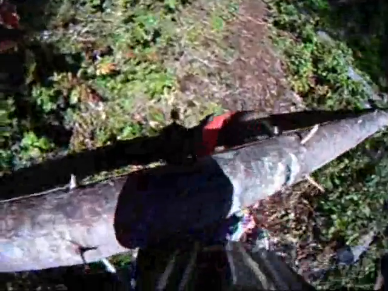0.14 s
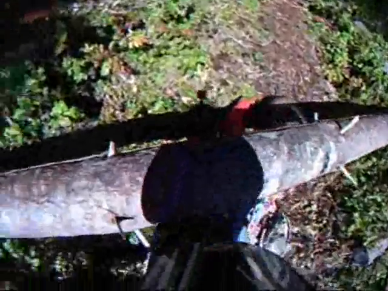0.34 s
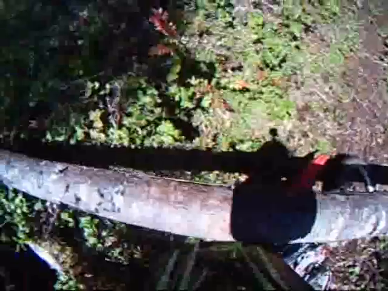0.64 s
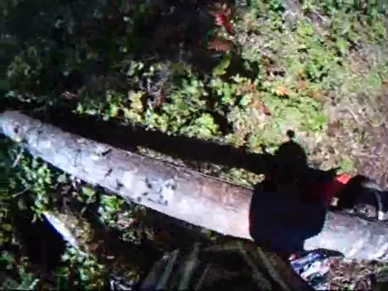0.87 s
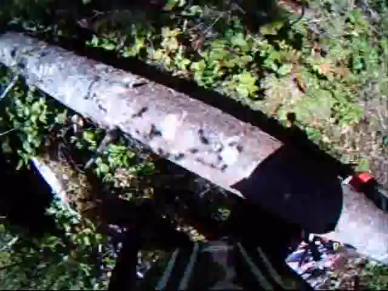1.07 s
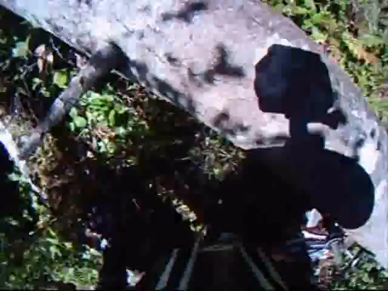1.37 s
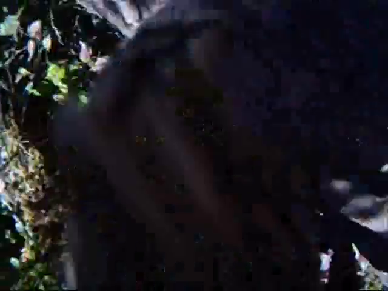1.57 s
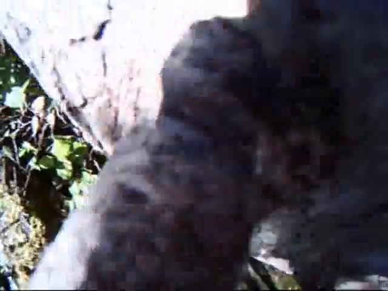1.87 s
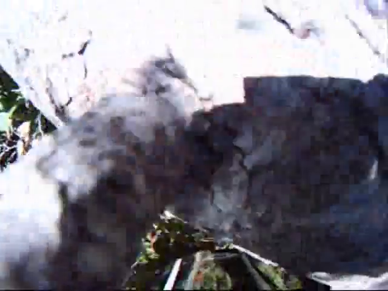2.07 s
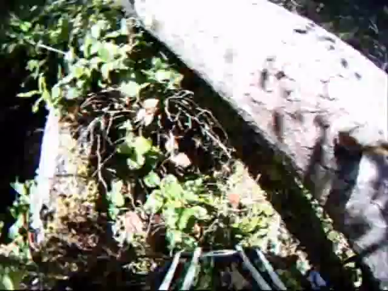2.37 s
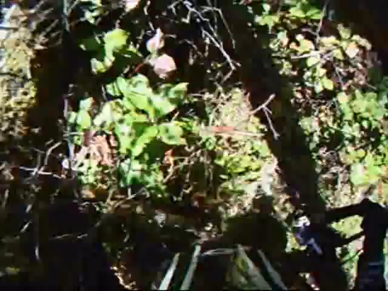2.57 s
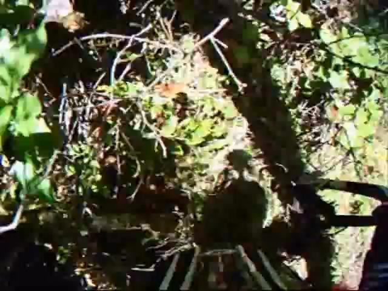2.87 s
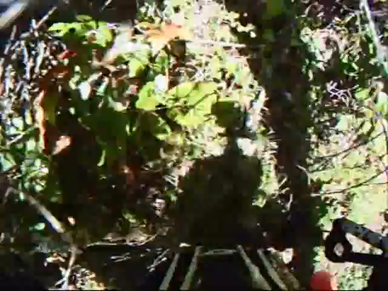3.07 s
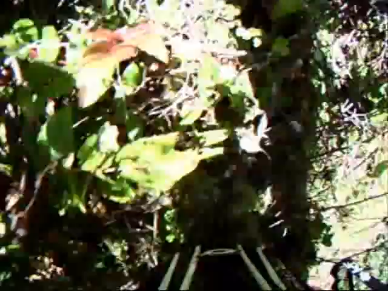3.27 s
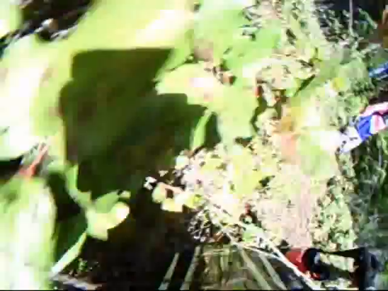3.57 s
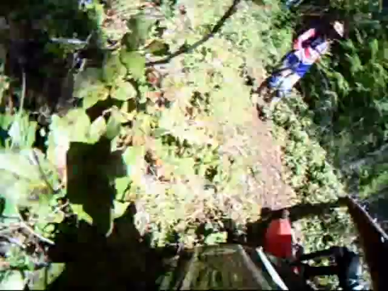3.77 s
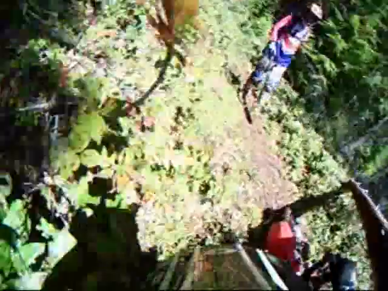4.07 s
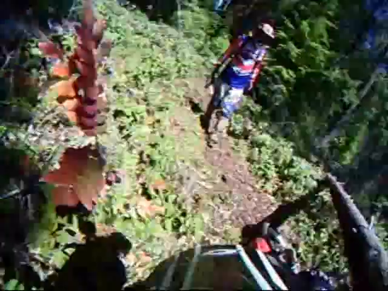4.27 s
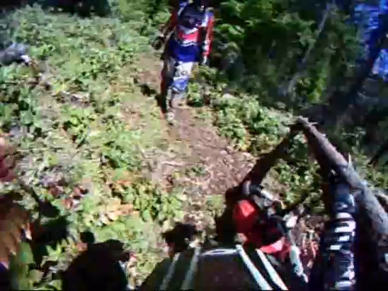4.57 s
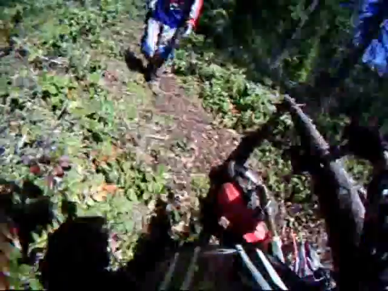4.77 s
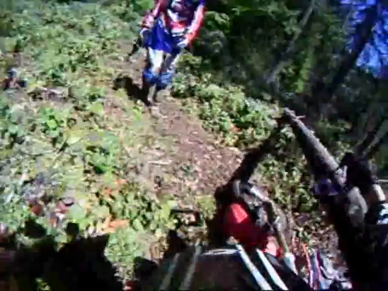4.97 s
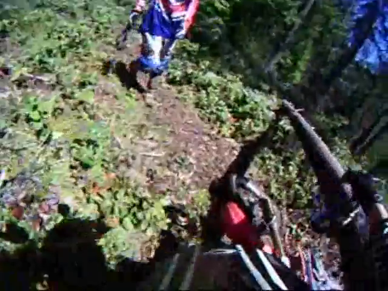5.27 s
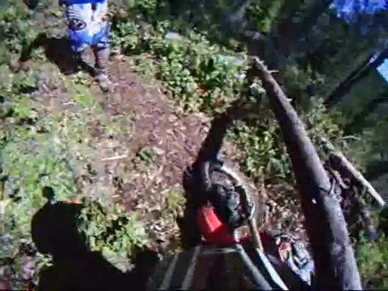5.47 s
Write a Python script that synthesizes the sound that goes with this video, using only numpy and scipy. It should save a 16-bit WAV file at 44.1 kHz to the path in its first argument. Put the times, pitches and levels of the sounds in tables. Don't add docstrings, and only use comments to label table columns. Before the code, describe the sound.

Close helmet microphone in a quiet forest: steady soft hiss and faint strap ticks, then a sudden crack and a rapid cluster of distorted blows against a log. Low stuttering rubs and bark chips follow until about two seconds in. After a lull, twigs and leaves scratch over the hollow shell with dull knocks, thinning to light touches and ticks.

```python
import sys
import numpy as np
from scipy import signal
from scipy.fft import rfft, irfft
from scipy.io import wavfile
from scipy.ndimage import uniform_filter1d

SR = 44100
rng = np.random.default_rng(int(sys.argv[2]) if len(sys.argv) > 2 else 0)


def level_to_linear(level):
    exponent = np.asarray(level, float) / 20
    return 10 ** exponent


def to_wav(sig):
    pcm = np.clip(np.atleast_2d(sig), -1, 1) * 32767
    pcm = np.round(pcm).astype(np.int16)
    wavfile.write(sys.argv[1], SR, pcm.T)


N = 248724

# frequency in Hz, density in dB per Hz.
HISS_COLOUR = [(150, -30.5), (250, 1.5), (424, -1), (543, -1.5), (610, -3), (1180, -5), (3460, -5.5),
               (3950, -16.5), (4580, -6), (7900, -26), (11200, -13.5), (13000, -26.5), (16900, -61.5),
               (22000, -120)]
# time in seconds, rumble level in dB.
AIR_LEVEL = [(0.0, -52), (0.53, -55.5), (1.44, -51.5), (1.56, -59.5), (1.68, -25), (1.82, -18), (1.88, -34),
             (1.99, -25), (2.12, -54), (2.2, -22), (2.3, -48), (3.05, -48), (3.42, -33.5), (3.5, -48.5),
             (3.88, -34.5), (4.13, -53.5), (4.75, -47.5), (5.64, -52.5)]
# frequency in Hz, density in dB per Hz.
AIR_COLOUR = [(5, -24.5), (15, 4.5), (30, 3), (50, -10.5), (80, -25), (150, -38.5)]
# frequency in Hz, density in dB per Hz.
FLUTTER_COLOUR = [(30, -25), (60, 2.5), (120, -3), (200, -11), (350, -25), (600, -45.5)]

# start in seconds, peak in dB.
TICKS = [(0.163, -43.5), (0.201, -45.5), (0.237, -49), (0.2937, -46.5), (0.3493, -43.5), (0.387, -42),
         (0.5511, -44), (0.597, -43.5), (0.6486, -43.5), (0.754, -43.5), (0.828, -44), (0.8833, -43),
         (0.9184, -43.5), (0.9547, -43.5), (1.0372, -43.5), (1.0946, -43.5), (1.1468, -44),
         (1.2135, -42.5), (1.223, -42), (1.2496, -41), (1.3299, -43.5), (1.345, -47), (1.357, -51),
         (1.373, -44.5), (1.379, -41.5), (1.387, -42), (1.5244, -43),
         (2.3938, -41.5), (2.431, -42), (2.518, -46.5), (2.6237, -42.5), (2.66, -45.5),
              (2.7565, -46.5), (2.7804, -45), (2.95, -43), (3.0308, -45), (4.1065, -47), (4.151, -41.5),
              (4.179, -44.5), (4.2305, -44), (4.4546, -46), (4.528, -50), (4.577, -43), (4.6796, -46.5),
              (4.6864, -45), (4.709, -42), (4.738, -44), (4.782, -47), (5.0943, -46.5), (5.1124, -51.5),
              (5.2753, -44.5), (5.4131, -44), (5.4387, -45), (5.4904, -44), (5.5776, -43.5),
              (5.5903, -41.5), (5.6164, -44.5)]
# start in seconds, peak in dB, centre in Hz, length in ms.
SNAPS = [
    (1.5723, 5.5, 2041, 2.5),
    (3.4192, -2, 1870, 0.94),
]

# frequency in Hz, width in Hz, gain in dB.
SHELL_MODES = [(646, 93, -9.5), (1072, 78, -12.5), (1683, 330, -6), (2324, 390, -2), (2505, 270, 0.5),
               (3770, 1100, -19.5), (4270, 880, -23), (5500, 260, -9.5), (6380, 320, -15),
               (6484, 120, -16.5), (9980, 1100, -16), (10630, 1400, -15.5), (12400, 1300, -28.5)]
# start in
# seconds, peak in dB.
CHIPS = [(0.223, -41.5), (1.724, -30), (1.7477, -26.5), (1.8274, -37.5), (1.8666, -30.5), (1.9001, -32),
         (1.9235, -36), (1.9426, -25.5), (1.9713, -29), (2.0183, -38), (2.0413, -43), (2.0522, -31.5),
         (2.074, -31.5), (2.085, -26.5), (2.2025, -22.5), (2.212, -18.5), (2.2234, -23)]
# start in seconds, peak in dB.
FLAKES = [(1.5995, -19), (1.606, -22), (1.6188, -16.5), (1.627, -16), (1.6371, -6), (1.6454, -13),
          (1.6578, -20.5), (1.667, -22.5), (1.6712, -10), (1.6755, -16.5), (1.6851, -5.5), (1.689, -15),
          (1.695, -16.5)]
# start in seconds, peak in dB.
TWIGS = [(3.047, -43), (3.0593, -24.5), (3.0768, -21), (3.0883, -23.5), (3.1107, -27.5), (3.114, -16.5),
         (3.131, -30), (3.1598, -24.5), (3.178, -25), (3.187, -23), (3.206, -19), (3.2131, -12.5),
         (3.221, -13), (3.2288, -11.5), (3.2372, -10), (3.2605, -20.5), (3.2883, -27), (3.3331, -17),
         (3.3516, -18), (3.3585, -20.5), (3.366, -19), (3.3855, -17), (3.3995, -15), (3.4225, -11.5),
         (3.4334, -21.5), (3.46, -20.5), (3.4646, -15.5), (3.4759, -21), (3.511, -37.5)]
# start in seconds, peak
# in dB.
STEMS = [(3.5627, -29), (3.5959, -20.5), (3.619, -32), (3.712, -38), (3.7425, -22), (3.791, -25.5),
         (3.8564, -19.5), (3.8645, -23.5), (3.873, -28), (3.885, -26), (3.8961, -23), (3.924, -32.5),
         (3.9439, -41), (3.955, -25.5), (3.967, -25.5), (3.9943, -33), (4.003, -32.5), (4.0293, -44),
         (4.0504, -39), (4.061, -29.5), (4.071, -30.5), (4.2792, -60), (4.2924, -48), (4.5865, -30),
         (4.6454, -40.5), (4.9709, -34), (4.9806, -36.5), (4.9995, -41.5), (5.1675, -36.5), (5.177, -41.5)]
# drag in ms (its size counts), lift of the low modes in dB,
# lift of the top modes in dB, dull body in dB.
FLAKE_TOUCH = (-4, 4.5, -4.5, -14)
CHIP_TOUCH = (3.5, -1.8, -3.5, -20.5)
TWIG_TOUCH = (5.5, -1.3, -2.5, -14)
STEM_TOUCH = (6.5, -9, -3.5, -31.5)

# start in seconds, signed swing in full scale, contact in ms.
BLOWS = [(1.5655, 0.77, 5.57), (1.5807, 0.78, 5.5), (1.590, .45, 2.2), (1.598, 0.037, 6.9), (1.609, .12, 5),
         (1.6202, .9, 7.8), (1.6378, -1.1, 4.2), (1.647, 0.43, 3.2), (1.6547, .95, 3), (1.671, .9, 3.7),
         (1.684, 1.2, 3.2), (1.6943, .45, 7.5)]
# time in seconds, grit level in dB.
BARK_RUBS = [
    [(1.695, -81), (1.723, -37), (1.805, -39.5), (1.85, -56)],
    [(1.85, -39), (1.892, -61.5), (1.926, -44), (1.99, -49), (2.11, -56), (2.2, -48.5)],
    [(2.195, -41), (2.215, -40), (2.285, -40), (2.36, -73)],
]
# frequency in Hz, density in dB per Hz.
BARK_COLOUR = [(180, -32.5), (300, -15.5), (521, -9.5), (660, 1), (862, -21), (1280, -20.5), (1670, -6),
               (3680, -21), (5630, -18.5), (6900, -27), (8080, -29), (13000, -26), (16900, -76.5),
               (22000, -120)]
# time in seconds, swing in dB, rate in Hz.
SHUDDERS = [
    [(1.698, -11, 74.2), (1.734, -20.5, 79.1), (1.785, -16.5, 79.9), (1.803, -7.5, 79.5), (1.83, -25, 79.5),
     (1.87, -52, 79.9)],
    [(1.91, -67, 76), (1.942, -14, 71), (1.965, -36.5, 77), (1.995, -29.5, 81), (2.028, -30.5, 79.4),
     (2.07, -70, 78.6)],
    [(2.195, -12, 83.6), (2.22, -6, 87.5), (2.243, -15.5, 78.1), (2.27, -11.5, 70.8), (2.293, -15, 72.6),
     (2.321, -57, 77.3), (2.42, -57.5, 72)],
]

# time in seconds, brush level in dB.
LEAF_STROKES = [
    [(2.58, -84), (2.62, -73.5), (2.69, -91), (2.76, -73), (2.95, -78.5)],
    [(3.03, -62), (3.12, -49), (3.15, -54.5), (3.23, -37.5), (3.275, -52), (3.37, -40), (3.44, -42.5),
     (3.526, -65)],
    [(3.526, -51.5), (3.64, -46.5), (3.716, -53.5), (3.878, -42), (4.056, -50), (4.16, -75)],
    [(4.25, -72.5), (4.274, -63), (4.446, -63), (4.556, -67)],
    [(4.556, -66), (4.6, -63), (4.66, -58), (4.742, -72), (4.8, -69.5)],
    [(4.9, -74), (4.98, -63), (5.07, -74), (5.194, -58.5), (5.258, -89), (5.466, -70), (5.64, -80.5)],
]
# lift of the low modes in dB, hum in dB, smoothness as a ratio.
STROKE_CHARACTER = [
    (0.5, 3.5, .4),
    (3.5, -2, 0.53),
    (1, -5, 0.38),
    (-9, -10.5, 1.1),
    (4, 2, .9),
    (3.5, 8, 0.78),
]
# start in seconds, peak in dB, pitch in Hz.
KNOCKS = [(2.61, -41.5, 185), (2.76, -56.5, 189), (3.109, -31, 184), (3.213, -22, 207), (3.229, -48, 184),
          (3.42, -29, 197), (3.817, -40, 204), (3.853, -29, 185), (4.225, -57.5, 183), (4.585, -36, 184.6),
          (4.645, -44, 189), (4.912, -53.5, 187.7), (4.977, -42.5, 191), (5.1115, -39, 191.4),
          (5.178, -36.5, 195), (5.416, -46, 160)]

# frequency in Hz, density in dB per Hz.
SLEW_COLOUR = [(300, 2.5), (2000, -0.5), (6500, -9), (7700, -7.5), (8000, 9.5), (8300, -7.5), (11500, -8.5),
               (12000, -10), (13000, -13)]

BOOM_HZ, BOOM_WIDTH_HZ = 177.3, 23.2
LOW_MODES_BELOW_HZ, TOP_MODES_ABOVE_HZ = 1300, 7907


def evened(x):
    return x / np.sqrt(np.mean(x ** 2) + 1e-20)


def add(mix, s, sound):
    part = mix[round(s * SR):][:len(sound)]
    part += sound[:len(part)]


def columns(rows):
    s, *values = np.transpose(rows)
    t = np.arange(s[0], s[-1], 1 / SR)
    return t, [np.interp(t, s, v) for v in values]


def noise(length):
    return rng.standard_normal(length)


def smoothed(x, size):
    return uniform_filter1d(uniform_filter1d(x, size), size)


def coloured(x, points):
    f, db = np.transpose(points)
    hz = np.fft.rfftfreq(len(x), 1 / SR)
    gain = level_to_linear(np.interp(np.log(hz + 1), np.log(f), db, -90, -90))
    return evened(irfft(rfft(x) * gain, len(x)))


def resonate(x, hz, width):
    return signal.lfilter(*signal.iirpeak(min(hz, SR / 2.1), hz / width, SR), x)


def hiss():
    drift_db = 0.98 * evened(uniform_filter1d(noise(N), 1500))
    return level_to_linear(-71 + drift_db) * coloured(noise(N), HISS_COLOUR)


def air():
    out = np.zeros(N)
    t, (db,) = columns(AIR_LEVEL)
    rumble_lumps, flutter_lumps = evened(smoothed(noise((2, len(t))), 1800))
    rumble = level_to_linear(db + 0.6 * rumble_lumps) * coloured(noise(len(t)), AIR_COLOUR)
    flutter_db = np.minimum(db - 13, -40)
    flutter = level_to_linear(flutter_db + 0.52 * flutter_lumps) * coloured(noise(len(t)), FLUTTER_COLOUR)
    add(out, t[0], rumble + flutter)
    return out


def drag(ms, rise_ms, release_ms):
    t = np.arange(2600) / SR * 1000
    bite = 1 + 1.4 * np.exp(-t / 1.3)
    release = np.exp(-np.maximum(t - abs(ms), 0) / release_ms)
    shape = np.minimum(t / rise_ms, 1) * level_to_linear(-0.45 * t) * bite * release
    uneven = level_to_linear(4.9 * evened(uniform_filter1d(noise(len(t)), 40)))
    return shape * uneven * noise(len(t))


def ticks():
    out = np.zeros(N)
    rows = list(SNAPS)
    for s, db in TICKS:
        hz = 2640 * np.exp(0.1 * rng.standard_normal())
        ms = 3.1 + 1.24 * (db + 45.5)
        rows.append((s, db, hz, ms))
    for s, db, hz, ms in rows:
        burst = drag(ms, rise_ms=0.41, release_ms=0.19)
        fizz = 0.26 if db > -20 else 0.32
        click = resonate(burst, hz, 0.64 * hz) + fizz * resonate(burst, 15000, 5600)
        add(out, s - 0.001, level_to_linear(db - 1.74) * click / abs(click).max())
    return out


def shell(x, top_db=0, vary_db=0, low_db=0):
    spot_db = vary_db * rng.standard_normal(len(SHELL_MODES))
    out = level_to_linear(-30) * resonate(x, 4500, 3700)
    for k, (hz, width, db) in enumerate(SHELL_MODES):
        lift_db = spot_db[k] + top_db * (hz > TOP_MODES_ABOVE_HZ) + low_db * (hz < LOW_MODES_BELOW_HZ)
        out = out + (-1) ** k * level_to_linear(db + lift_db) * resonate(x, hz, width)
    return out


def scratches():
    out = np.zeros(N)
    kinds = (CHIPS, CHIP_TOUCH), (FLAKES, FLAKE_TOUCH), (TWIGS, TWIG_TOUCH), (STEMS, STEM_TOUCH)
    for rows, (ms, low_db, top_db, body_db) in kinds:
        for s, db in rows:
            longer, brighter = rng.standard_normal(2)
            burst = drag(ms * np.exp(0.16 * longer), rise_ms=0.42, release_ms=3.2)
            ringing = shell(burst, top_db=top_db + 2.5 * brighter, vary_db=2.4, low_db=low_db)
            body = level_to_linear(body_db) * evened(resonate(burst, 380, 380))
            scratch = evened(ringing) + body
            add(out, s - 0.0006, level_to_linear(db - 1.83) * scratch / abs(scratch).max())
    return out


def swing_of(size, rise_ms, fall_ms):
    ms = np.arange(1500) / SR * 1000
    rise = np.sin(np.pi / 2 * np.minimum(ms / rise_ms, 1)) ** 2
    return size * rise * np.exp(-np.maximum(ms - rise_ms, 0) / fall_ms)


def blows():
    out = np.zeros(N)
    for s, swing, contact_ms in BLOWS:
        add(out, s, swing_of(swing, rise_ms=0.82, fall_ms=1.3 * contact_ms))
        rebound = -1.4 * swing * np.exp(-contact_ms / 27)
        add(out, s + contact_ms / 1000, swing_of(rebound, rise_ms=1.3, fall_ms=4.8))
    return signal.lfilter(*signal.butter(1, 26, "high", fs=SR), out)


def grit(length, per_s, spread_db, smooth):
    sizes = level_to_linear(spread_db * np.minimum(rng.exponential(1, length), 4))
    slips = sizes * (rng.random(length) < per_s / SR)
    bursts = signal.lfilter([1], [1, -np.exp(-1 / (0.0085 * SR))], slips)
    return evened(smooth + evened(bursts)) * noise(length)


def bark():
    out = np.zeros(N)
    for rows in BARK_RUBS:
        t, (db,) = columns(rows)
        rub = coloured(grit(len(t), per_s=110, spread_db=8.5, smooth=2.8), BARK_COLOUR)
        add(out, t[0], level_to_linear(db) * rub * signal.windows.tukey(len(t), 0.04))
    return out


def thud(length):
    x = noise(length)
    body = evened(resonate(resonate(x, 150, 200), 190, 280))
    hollow = evened(resonate(resonate(x, 510, 300), 510, 300))
    return body + level_to_linear(-16.5) * hollow


def shudder():
    out = np.zeros(N)
    for rows in SHUDDERS:
        t, (db, hz) = columns(rows)
        wander = evened(smoothed(noise(len(t)), 400))
        phase = 2 * np.pi * np.cumsum(hz * (1 + 0.17 * wander)) / SR
        wave = np.sin(phase) + 0.15 * np.sin(2 * phase + 3.5) + 0.013 * np.sin(3 * phase)
        swing = np.sqrt(2) * level_to_linear(db) * wave
        swing = swing + level_to_linear(db - 17.5) * thud(len(t))
        add(out, t[0], swing * signal.windows.tukey(len(t), 0.1))
    return out


def boom(length):
    broad = resonate(noise(length), BOOM_HZ, 3.8 * BOOM_WIDTH_HZ)
    return evened(resonate(broad, BOOM_HZ, 0.92 * BOOM_WIDTH_HZ))


def leaves():
    out = np.zeros(N)
    for rows, (low_db, hum_db, smooth) in zip(LEAF_STROKES, STROKE_CHARACTER):
        t, (db,) = columns(rows)
        slips = grit(len(t), per_s=130, spread_db=2.5, smooth=smooth)
        brush = evened(shell(slips, vary_db=1.0, low_db=low_db))
        hum = level_to_linear(hum_db) * boom(len(t))
        body = level_to_linear(-17) * evened(resonate(slips, 299, 220))
        add(out, t[0], level_to_linear(db) * (brush + hum + body) * signal.windows.tukey(len(t), 0.04))
    return out


def knocks():
    out = np.zeros(N)
    t = np.arange(8000) / SR
    overtone = 0.26 * np.sin(2 * np.pi * SHELL_MODES[0][0] * t) * level_to_linear(-60 * t / 0.079)
    for s, db, hz in KNOCKS:
        ring = (np.sin(2 * np.pi * hz * t) + overtone) * level_to_linear(-60 * t / 0.13)
        hum = level_to_linear(-5.5 - 60 * t / 0.17) * boom(len(t))
        add(out, s, level_to_linear(db) * (hum - ring) * np.minimum(t / 0.00086, 1))
    return out


def scene():
    surroundings = hiss() + air() + ticks()
    impact = blows() + bark() + shudder()
    brushing = scratches() + leaves() + knocks()
    return (surroundings + impact + brushing)[None]


def roll_off(x):
    return signal.sosfilt(signal.butter(12, 13120, fs=SR, output="sos"), x)


def record(dry):
    lows = smoothed(dry, 30)
    slew = abs(np.gradient(lows, axis=1)) * SR / 500
    whine = uniform_filter1d(slew, 60) ** 1.044 * coloured(noise(N), SLEW_COLOUR)
    noisy = dry + level_to_linear(-30.5) * whine
    chatter = 0.18 * uniform_filter1d(noise(dry.shape), 5)
    over_rail = abs(noisy) + chatter > 0.96
    wrapped = np.where(over_rail, noisy - 0.57 * np.sign(noisy), noisy)
    lowpass = signal.firwin(511, 13000, window=("kaiser", 6), fs=SR)
    limited = signal.oaconvolve(wrapped, lowpass[None], "same")
    return roll_off(np.clip(limited, -0.95, 0.95))


dry = scene()
out = record(dry)
to_wav(out)
```